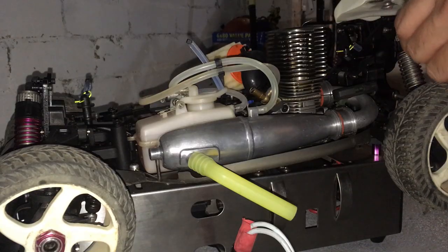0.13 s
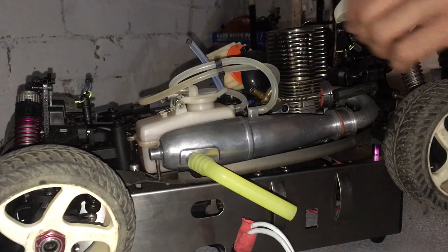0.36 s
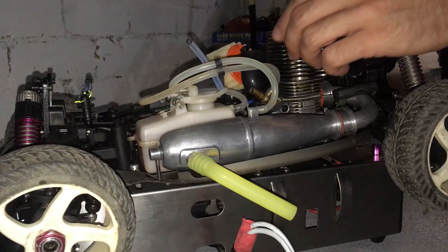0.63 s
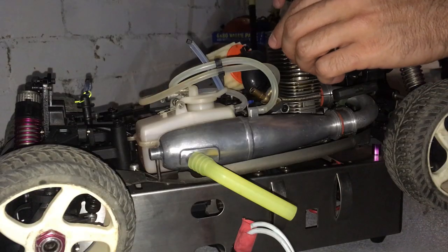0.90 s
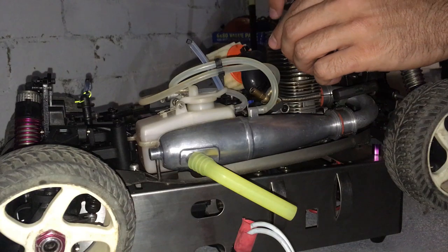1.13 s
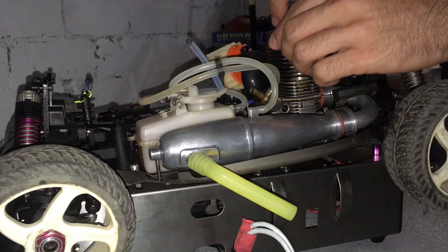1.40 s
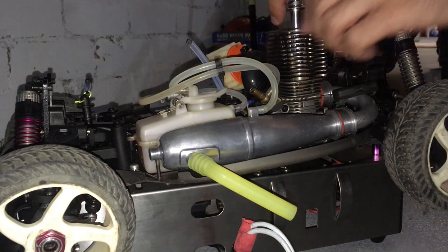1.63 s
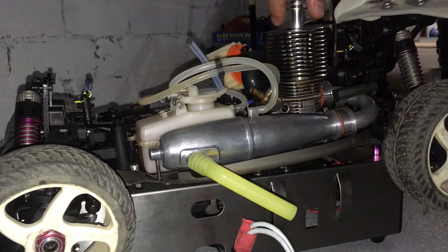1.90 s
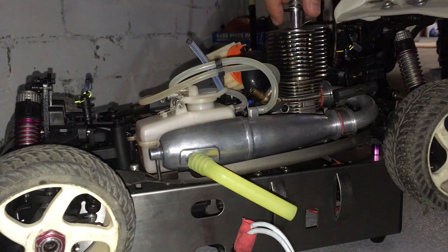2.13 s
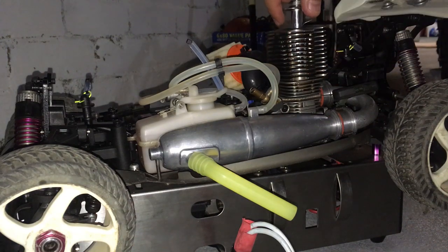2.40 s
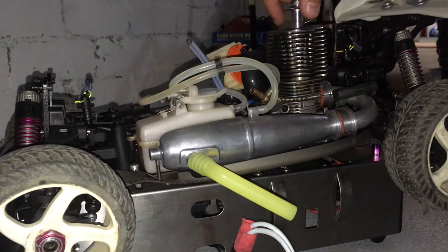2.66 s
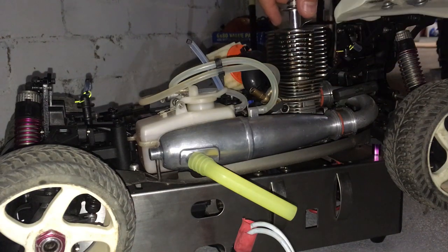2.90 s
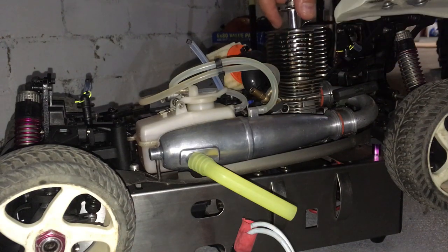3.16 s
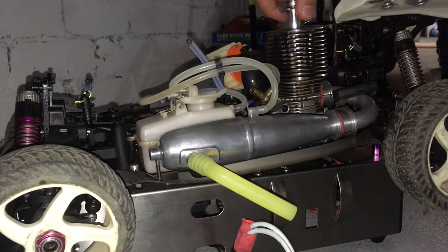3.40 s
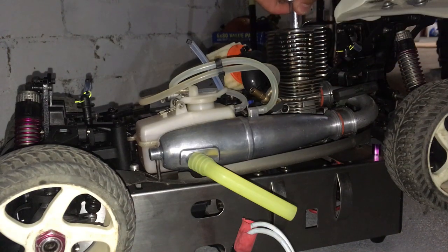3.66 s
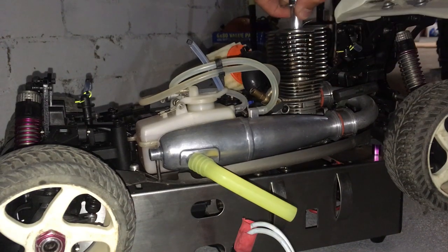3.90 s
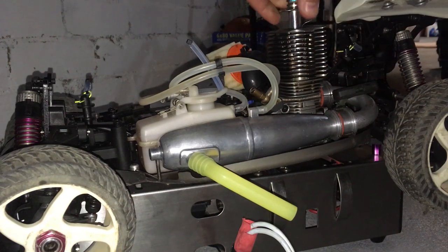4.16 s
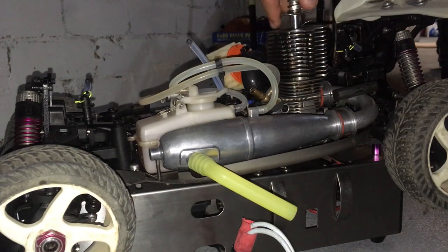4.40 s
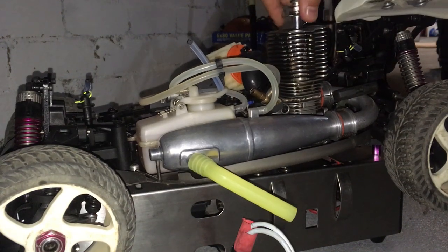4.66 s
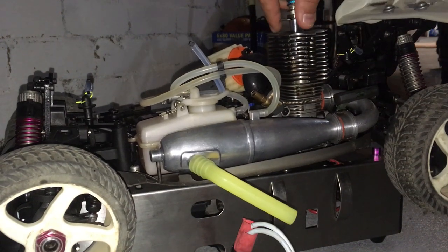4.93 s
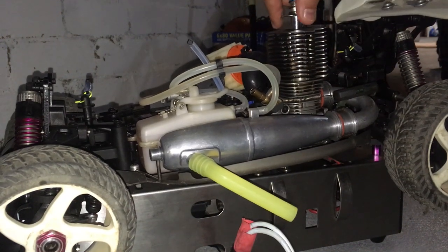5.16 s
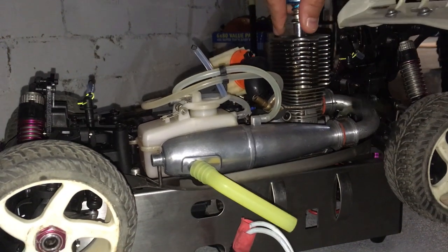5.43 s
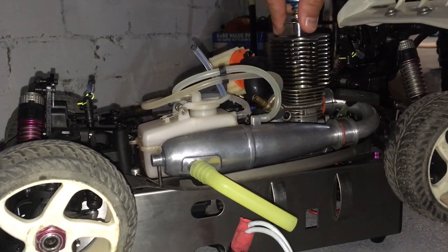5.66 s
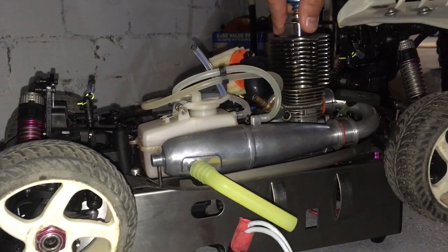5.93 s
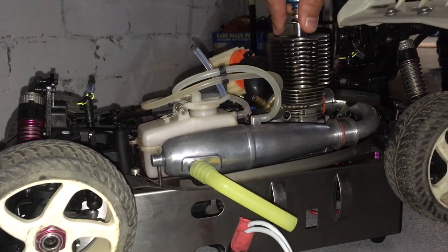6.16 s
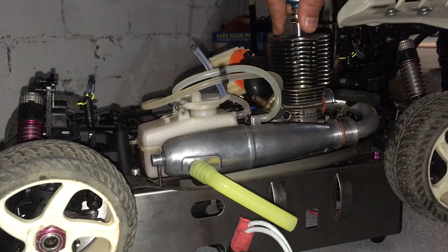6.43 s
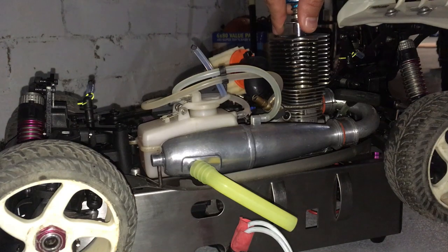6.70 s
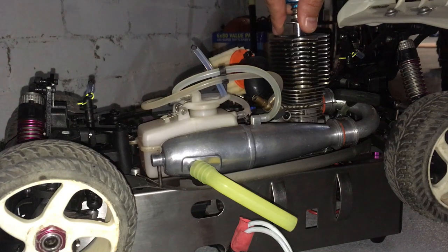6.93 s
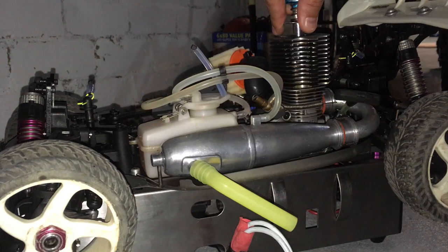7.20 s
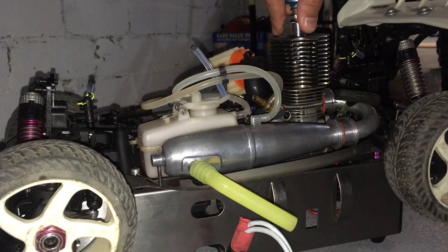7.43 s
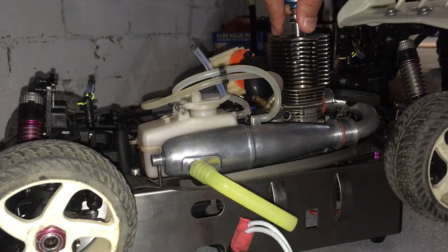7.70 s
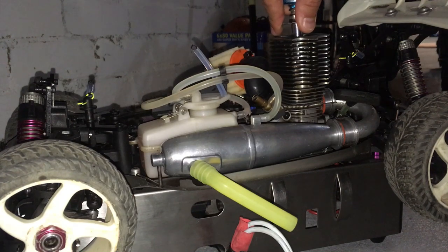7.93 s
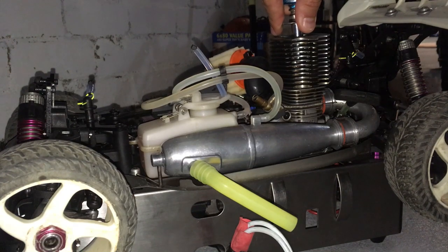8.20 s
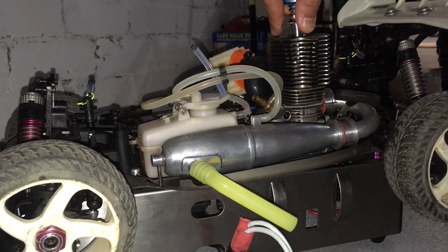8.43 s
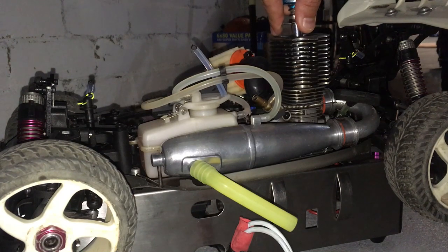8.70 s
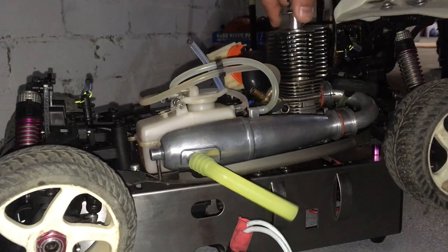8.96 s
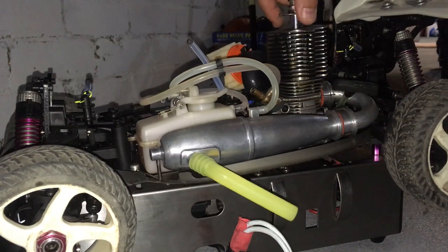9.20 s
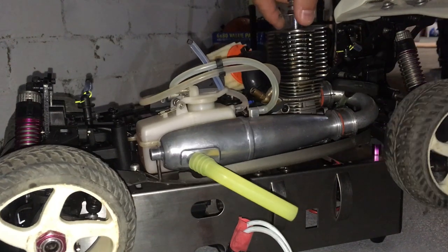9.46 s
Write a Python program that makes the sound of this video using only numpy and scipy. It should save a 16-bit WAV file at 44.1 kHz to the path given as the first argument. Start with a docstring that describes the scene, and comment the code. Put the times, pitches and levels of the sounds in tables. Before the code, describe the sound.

Close to a model car in a quiet garage with a low hum. Small taps and finger rubs come first, with one firmer knock, then a bright ringing metal snap. An electric starter whirs up over a boxy rumble, sags, and the small two-stroke catches abruptly, far louder. It sputters in fast irregular clatters with metallic hiss and a thin whistle, turning more jingly at the end.

```python
"""A small two-stroke engine of a model car turns at idle, clattering hard every few turns: shaft orders, plus
noise pulsed by the crank and filtered by body and metal modes. Thin whistles ride on it. Before that an
electric starter box spins up (gear mesh whine over a rumble) and the car is pressed onto its wheel. First of
all, hands fumble with the glow igniter (decaying noise bursts), which snaps on (a crack and ringing modes).
The quiet garage adds a diffuse tail, filtered noise and two hums."""
import sys
import numpy as np
from scipy import signal
from scipy.io import wavfile
from scipy.ndimage import uniform_filter1d

SR = 44100
rng = np.random.default_rng(int(sys.argv[2]) if len(sys.argv) > 2 else 0)


def wav_out(sig):
    """Save sig, one row per channel (or a flat mono array), as 16-bit PCM at SR to the path in sys.argv[1]."""
    wavfile.write(sys.argv[1], SR, np.round(np.clip(np.atleast_2d(sig).T, -1, 1) * 32767).astype(np.int16))


def boost_factor(decibels):
    """Convert a level in decibels to a linear amplitude factor."""
    exponent = np.asarray(decibels, float) / 20
    return 10 ** exponent


N = 422478  # length [samples]


def evened(x):
    """Normalization: scales a signal to rms 1."""
    return x / np.sqrt(np.mean(x ** 2) + 1e-20)


def curves(rows):
    """Linear interpolation of each column over time, and a soft-edged mask for the span of the rows."""
    s, *columns = np.transpose(rows)
    t = np.arange(N) / SR
    inside = 1. * ((t > s[0]) & (t < s[-1]))
    return [np.interp(t, s, c) for c in columns] + [uniform_filter1d(inside, size=200)]


def colour(x, points, modes=(), size=8192):
    """Minimum-phase filtering: a smooth spectrum plus resonant peaks, impulse response of energy 1."""
    hz = abs(np.fft.fftfreq(size, 1 / SR))
    points_hz, points_db = np.array(points).T
    power = boost_factor(np.interp(np.log(hz + 1), np.log(points_hz + 1), points_db)) ** 2
    for f, width, db in modes:
        power = power + boost_factor(db) ** 2 / (1 + (2 * (hz - f) / max(width, 4)) ** 2) ** 2
    log_gain = .5 * np.log(power + 1e-10)
    # the Hilbert transform of the log gain supplies the minimum phase
    taps = np.fft.ifft(np.exp(signal.hilbert(log_gain).conj())).real[:size // 2]
    return signal.oaconvolve(x, taps / np.linalg.norm(taps))[:len(x)]


def wander(hz):
    """Low-pass random process: slow chance of rms 1, up to about the given frequency."""
    return evened(signal.sosfilt(signal.butter(2, hz, fs=SR, output="sos"), rng.standard_normal(N)))


def bursts(s, db, t60, rise_s, size=SR // 4):
    """Impulsive excitation: at each time a quick rise and an exponential fall of 60 dB in t60 [s]."""
    t, out = np.arange(size) / SR, np.zeros(N + size)
    shape = (1 - np.exp(-t / rise_s)) * boost_factor(-60 * t / t60)
    gains = boost_factor(db) * np.ones(len(s)) / shape.max()
    for at, gain in zip((np.asarray(s) * SR).astype(int), gains):
        out[at:at + size] += gain * shape
    return out[:N]


# engine noise: (time [s], relative body noise level [dB], relative metal hiss level [dB])
ENGINE = [(5.432, -12, -21), (5.945, -12.5, -20.5), (5.975, -25, -28), (6.5, -22.5, -25),
          (8.88, -21.5, -24.5), (8.96, -23, -24), (9.58, -21.5, -25.5)]
# shaft speed: (time [s], rate [turns/s])
SPEED = [(5.41, 112.0), (5.5, 121.0), (5.57, 126.0), (5.72, 138.9), (5.96, 140.1), (6.08, 141.6),
         (7.32, 141.25), (7.55, 142.2), (8.0, 142.3), (8.22, 143.6), (8.9, 144.2), (9.0, 147.0),
         (9.12, 155.0), (9.58, 155.0)]
START_TURN = .22  # crank position at time zero [turns]
# course of the run, 0 catching, 1 pressed, 2 settled, 3 faster, 4 rattling: (time [s], stage [-])
STAGE = [(5.41, 0), (5.66, 0), (5.72, 1), (5.95, 1), (5.98, 2), (8.08, 2), (8.2, 3), (8.91, 3), (8.95, 4),
         (9.6, 4)]
# shaft orders, the quarter ones strongest when rattling:
# (multiple of shaft rate [-], then nominal rms level [dB] catching, pressed, settled, faster, rattling)
ORDERS = [(1, -34, -31, -37.5, -36, -43), (1.25, -60, -60, -60, -60, -46), (1.5, -60, -60, -60, -60, -48),
          (2, -39, -50, -60, -56, -55), (2.25, -60, -60, -60, -60, -40), (2.5, -60, -60, -60, -60, -46),
          (2.75, -60, -60, -60, -60, -47), (3, -33, -39, -53, -55, -55), (3.5, -60, -60, -60, -60, -40),
          (3.75, -60, -60, -60, -60, -41), (4, -44, -30, -44, -41, -51), (4.75, -60, -60, -60, -60, -42),
          (5, -34, -33, -30.5, -42, -55), (8, -46, -35, -33, -34, -45), (9, -42, -45, -55, -54, -42),
          (10, -38, -40, -34, -37, -44), (11, -50, -38, -39, -40, -46), (12, -45, -43, -52, -58, -43)]
# hand pushing the car down: (time [s], share [0-1])
PRESSED = [(5.41, 1), (5.95, 0.44), (5.975, 0.33), (9.6, 0)]
# loose igniter ringing on the plug: (time [s], share [0-1])
RINGING = [(5.41, 0.2), (8.9, 0), (8.98, 0.82), (9.6, 1)]
# smooth body spectrum: (frequency [Hz], relative level [dB])
BODY = [(18, -71), (30, -35), (135, 0.5), (218, -14.5), (618, -7.5), (707, 4.5), (809, -5.5), (1120, 2),
        (1290, -4.5), (1420, -6), (3000, -12.5), (3900, -55), (6600, -120)]
# chassis and pipe: (frequency [Hz], width [Hz], relative level [dB] free, pressed, rattling)
BODY_MODES = [(89.7, 18, -47, -2.5, -32), (265.6, 20.5, -15.5, -5, -20), (368, 145, -15.5, -8, -13.5),
              (547.2, 29.5, -4.5, 1, 0), (720, 36, -7, 0, -11), (960, 140, -16, -14, -7),
              (1139, 115, -1.5, -1.5, -1), (1415, 84, 2, -9, 3.5), (1466, 59, -28, 4, -2.5),
              (1594, 133, -1.5, -9, -0.5), (1797, 140, -7, -14, -8.5), (2168, 97, -7, -38, -6.5)]
# smooth metal spectrum: (frequency [Hz], relative level [dB])
METAL = [(1200, -40.5), (1800, -7), (2500, -3.5), (4200, -1.5), (5200, -5), (5500, -7), (7200, -5.5),
         (9000, -7), (9600, -8.5), (11000, -7), (12800, -8.5), (15500, -3)]
# head fins, clutch and igniter: (frequency [Hz], nominal width [Hz], relative level [dB] plain, ringing)
METAL_MODES = [(3340, 360, 0, 0), (4660, 140, 6, 0), (4860, 100, 4, -3), (5910, 110, 2, 8),
               (6120, 60, -3, 9), (6300, 120, 3, 2), (6480, 180, 3, 8), (6680, 60, 1, 0),
               (8440, 400, -1, -3), (9320, 90, 0, -3), (10100, 220, -2, 5), (11200, 220, 4, 1),
               (11800, 200, 0, -1), (13900, 300, 1, 3), (14230, 220, -4, 7), (15600, 300, 3, -1)]


def engine():
    """Source-filter principle: crank-timed pulses of noise excite body and metal modes, over shaft harmonics."""
    body_db, metal_db, on = curves(ENGINE)
    (pressed, _), (ringing, _), (stage, _) = curves(PRESSED), curves(RINGING), curves(STAGE)
    turns = START_TURN + np.cumsum(curves(SPEED)[0]) / SR

    # one tick each turn, of random strength
    tick_s = np.flatnonzero(np.diff(np.floor(turns))) / SR
    tick_db = 3.1 * rng.standard_normal(len(tick_s))
    ticks = bursts(tick_s, tick_db, 0.027, rise_s=0.000074, size=2000)

    s, db = firings(turns)
    swollen_ticks = bursts(s, db, 0.049, rise_s=0.011, size=8000) * (0.21 + ticks)
    hard = bursts(s, db, 0.035, rise_s=0.000087, size=4000) + 0.24 * swollen_ticks
    blow = bursts(s, db, 0.00088, rise_s=.0001, size=200)  # one push into the body at each clatter
    # the loose igniter jingles through each clatter
    shake = bursts(s - .004, db, 0.04, rise_s=0.0036, size=4000)

    orders = np.zeros(N)
    for multiple, *stage_db in ORDERS:
        order_db = np.interp(stage, range(5), stage_db) + 0.4 * wander(9.7)
        orders += np.sqrt(2) * boost_factor(order_db) * np.sin(2 * np.pi * (multiple * turns + rng.random()))

    thud_noise, hiss_noise, crash_noise = rng.standard_normal((3, N))
    thud_level = boost_factor(body_db - 8.5) * (0.62 + 1.29 * ticks) + boost_factor(-27.0 + 15.2 * pressed) * hard
    thud = thud_noise * thud_level + boost_factor(-13.5) * blow
    hiss = hiss_noise * boost_factor(metal_db) * (0.86 + 0.47 * ticks)
    crash = crash_noise * (boost_factor(-8) * hard + ringing * boost_factor(-17.5) * shake)
    crash += boost_factor(-6.5) * np.diff(blow, prepend=0) * 4

    under = [(f, db - 9.5) for f, db in BODY]
    free_body, pressed_body, rattling_body = [
        colour(thud, under, [(f, w, levels[k]) for f, w, *levels in BODY_MODES]) for k in range(3)]
    # the steady hiss is fairly flat; the clatters ring the metal modes much harder
    plain_metal, ringing_metal = [
        colour(hiss, METAL, [(f, w, levels[k] - 4) for f, w, *levels in METAL_MODES])
        + colour(crash, METAL, [(f, 1.4 * w, levels[k] + 3.5) for f, w, *levels in METAL_MODES])
        for k in range(2)]
    body = (1 - pressed - ringing) * free_body + pressed * pressed_body + ringing * rattling_body
    metal = (1 - ringing) * plain_metal + ringing * ringing_metal
    return on * (orders + body + metal)


# the loudest firings: (time [s], relative peak level [dB])
CLATTERS = [(5.4338, -5), (5.4555, -2.5), (5.4893, -4.5), (5.5854, -9.5), (5.6077, -6), (5.7121, -4),
            (5.7697, -4), (5.8396, -7), (5.899, -5), (5.9298, -6.5), (6.0125, -8.5), (6.041, -9),
            (6.097, -7), (6.1543, -5), (6.1829, -4.5), (6.2592, -6), (6.31, -6), (6.3727, -5), (6.408, -10),
            (6.5209, -5), (6.5983, -7.5), (6.697, -6), (6.849, -13), (6.9102, -10), (6.9593, -12),
            (6.9877, -6), (7.0719, -9), (7.1438, -7.5), (7.228, -7), (7.419, -5.5), (7.5178, -8),
            (7.6103, -6.5), (7.7636, -9), (7.9046, -9.5), (7.9468, -7), (8.101, -7.5), (8.1569, -9),
            (8.3512, -8), (8.4498, -7), (8.5677, -12), (8.6782, -8.5), (8.8175, -6), (8.8657, -8),
            (8.9311, -7), (8.994, 0), (9.0222, -8.5), (9.1381, -7), (9.2214, -6.5), (9.3055, -4.5),
            (9.3358, -4.5), (9.3658, -8.5), (9.3924, -6.5), (9.4446, -7.5), (9.475, -5), (9.5466, -4.5)]
TURNS_PER_FIRING, UNEVEN_TURNS = 4.2, .35  # the rich mixture lights about every fourth turn
# ordinary firings; a longer wait stores more charge
FIRING_DB, DB_PER_TURN_WAITED, FIRING_SPREAD_DB = -10, 1, 1.05


def firings(turns):
    """Irregular combustion: the loudest firings and, between them, ordinary ones whole turns after these."""
    s, db = np.transpose(CLATTERS)
    crank = turns[(s * SR).astype(int)]
    gaps = np.diff(np.append(crank, turns[-1]))
    counts = np.maximum(np.round(gaps / TURNS_PER_FIRING), 1).astype(int)
    steps = np.concatenate([np.arange(1, n) * gap / n for gap, n in zip(gaps, counts)])
    timing_luck, level_luck = rng.standard_normal((2, len(steps)))
    at = np.repeat(crank, counts - 1) + np.round(steps + UNEVEN_TURNS * timing_luck)
    before = np.sort(np.append(crank, at))
    waited = at - before[np.searchsorted(before, at) - 1]
    level_db = FIRING_DB + DB_PER_TURN_WAITED * (waited - TURNS_PER_FIRING) + FIRING_SPREAD_DB * level_luck
    return np.append(s, np.searchsorted(turns, at) / SR), np.append(db, level_db)


# a long thin whistle and a brief one, each: (time [s], nominal frequency [Hz], nominal rms level [dB])
WHISTLE = [
    [(5.98, 3975, -50), (7.6, 3990, -46), (7.8, 4005, -37), (8.92, 4012, -36), (9.0, 3750, -43),
     (9.12, 3100, -46), (9.16, 3000, -55)],
    [(9.25, 1860, -45), (9.3, 1850, -27), (9.36, 1700, -40)],
]


def whistle():
    """Frequency and amplitude modulation: thin sine tones that waver slightly over the running engine."""
    waver = 1 + .0015 * wander(30)
    flutter_db = 2.5 * wander(25)
    out = np.zeros(N)
    for hz, db, on in map(curves, WHISTLE):
        phase = 2 * np.pi * np.cumsum(hz * waver) / SR
        out += on * np.sqrt(2) * boost_factor(db + flutter_db) * np.sin(phase)
    return out


# starter motor: (time [s], gear mesh frequency [Hz], relative mesh level [dB], relative box rumble level [dB])
STARTER = [(4.94, 1387, -32, -37.5), (5.03, 2880, -23, -28.5), (5.09, 3420, -27.5, -28.5),
           (5.14, 3337, -25.5, -26.5), (5.33, 2228, -29.5, -30), (5.36, 2900, -22, -30.5),
           (5.412, 3260, -23, -26), (5.51, 3515, -31, -29), (5.7, 3530, -41, -32)]
TEETH = 13  # gear mesh cycles in each shaft turn
# harmonics of the gear mesh: (multiple [-], relative level [dB])
MESH_ORDERS = [(1, 0), (2, -19), (3, -21)]
# smooth box spectrum: (frequency [Hz], relative level [dB])
BOX = [(35, -59), (60, -30), (227, -4), (480, -18), (682, 9), (842, 0.5), (2580, -1.5), (2900, 3.5),
       (4030, -15.5), (16000, -17)]
# box resonances: (frequency [Hz], width [Hz], relative level [dB])
BOX_MODES = [(645, 214, -5.5), (1158, 120, -0.5), (1430, 50, -11), (1620, 22, -11), (1840, 72, -3)]
# the motor kicks the box: (time [s], relative peak level [dB])
CLUNKS = [(4.947, -10), (4.968, -22.5), (5.038, -28), (5.342, -15.5), (5.419, -16)]
# what a clunk rings: (frequency [Hz], width [Hz], relative level [dB])
KICKED = [(316, 190, -12.5), (688, 88, 10), (1130, 370, -4.5), (1800, 190, -6)]


def starter():
    """Gear mesh principle: tooth rate is shaft rate times teeth; a fuzzy whine, a shaft tone and a rumbling box."""
    mesh_hz, mesh_db, box_db, on = curves(STARTER)
    mesh_turns = np.cumsum(mesh_hz * (1 + .03 * wander(120))) / SR  # uneven teeth smear the whine
    mesh = sum(boost_factor(db) * (1.04 + 0.55 * wander(320)) * np.sin(2 * np.pi * k * mesh_turns)
               for k, db in MESH_ORDERS)
    shaft_turns = np.cumsum(mesh_hz / TEETH) / SR
    # the load stills the box once the car is pressed on
    free = np.interp(np.arange(N) / SR, [5.40, 5.43], [1, 0])
    shaft_level = free * boost_factor(-38.0) * np.clip(mesh_hz / 2200, 0, 1) ** 4
    shaft_tone = shaft_level * np.sin(2 * np.pi * shaft_turns)

    shaking = free * on * boost_factor(box_db + 2.0) * (1 + 0.1 * np.cos(2 * np.pi * shaft_turns))
    box_modes = [(f, w, db + 12.5) for f, w, db in BOX_MODES]
    rumble = colour(rng.standard_normal(N) * shaking, BOX, box_modes)

    s, db = np.transpose(CLUNKS)
    kick_noise = rng.standard_normal(N) * bursts(s, db - 1, 0.12, rise_s=0.00048)
    kicks = colour(kick_noise, [(100, -27), (3000, -24.5), (16000, -57)], KICKED)
    return on * (boost_factor(mesh_db) * mesh + shaft_tone) + rumble + kicks


# the igniter clamp shuts and bounces: (time [s], relative peak level [dB])
SNAPS = [(4.2955, -4), (4.302, -9)]
# spectrum of the crack: (frequency [Hz], relative level [dB])
SNAP_CRACK = [(80, -27), (300, -17), (750, -9), (1600, -8.5), (3500, -7), (5000, -8), (8000, -2),
              (11000, -8.5), (16000, -9.5)]
# ringing clamp: (frequency [Hz], relative level [dB], decay time t60 [s])
CLAMP = [(4231, 0, .45), (4275, -3, .38), (5911, -5, .25), (6471, -3, .22), (7950, 0, .22), (8473, -6, .3),
         (9383, -2, .28)]


def snap():
    """Modal impact: a shutting steel clamp gives a crack of noise and exponentially decaying modes."""
    s, db = np.transpose(SNAPS)
    crack = colour(rng.standard_normal(N) * bursts(s, db - 8.5, 0.041, rise_s=0.00023), SNAP_CRACK)
    t = np.arange(SR) / SR
    ring = sum(boost_factor(d - 60 * t / t60) * np.sin(2 * np.pi * f * t) for f, d, t60 in CLAMP)
    strikes = bursts(s, db - 36, .0004, rise_s=.00002)
    return crack + signal.oaconvolve(strikes, ring)[:N]


# small knocks of the hands and igniter: (time [s], relative peak level [dB], clack above that [dB],
# treble above that [dB], decay time t60 of the dull part [s])
TAPS = [(0.813, -43.5, 2.5, 1, 0.098), (0.985, -62, -11, 4, 0.091), (1.238, -45.5, -8, -11, 0.093),
        (1.262, -46, -16, -2, 0.038), (1.709, -64, 1, -2.5, 0.086), (1.969, -64, -9, -26, 0.085),
        (2.169, -59, -6, -18, 0.091), (2.238, -55.5, -6, -11, 0.25), (2.379, -48, -30, -29, 0.046),
        (2.445, -49, -26, -25.5, 0.1), (2.545, -53, 1, -17, 0.068), (2.643, -43.5, -10, -6, 0.38),
        (2.674, -20.5, -12, -34, 0.057), (2.971, -51, -23, -24, 0.06), (3.019, -53.5, -15, -23, 0.046),
        (3.481, -57, -13, -3, 0.12), (3.8, -59, -29, -25, 0.1), (3.994, -58, -14, -3, 0.11),
        (4.218, -44, -6, -13, 0.11), (4.712, -33, -39, -38.5, 0.044)]
# strokes of fingers on metal and plastic:
# (start [s], length [s], relative dull level [dB], relative bright level [dB])
RUBS = [(1.913, 0.19, -64, -70), (2.038, 0.12, -53.5, -50.5), (2.234, 0.13, -60.5, -67),
        (2.34, 0.066, -57, -80), (2.415, .1, -46.5, -60), (2.476, 0.11, -51.5, -49.5),
        (2.68, 0.14, -43, -63), (2.803, 0.17, -53, -52.5), (4.256, 0.078, -57, -61),
        (4.732, 0.26, -63, -77)]
RUB_PEAK, RUB_EDGE_DB = 0.25, -20.5  # share of the stroke at which it is loudest; level at its ends
# what the taps and rubs ring: (frequency [Hz], width [Hz], relative level [dB])
CHASSIS = [(823, 37, 1.5), (970, 160, -1.5), (1250, 120, -7), (1420, 120, -7), (1620, 16, -12),
           (1870, 35, -5.5), (2660, 34, -17)]
# metal part of a tap: (frequency [Hz], relative level [dB])
CLACK = [(900, -36), (2000, 6), (2500, 3), (3300, -6.5), (6000, -36)]


def hands():
    """Impact and friction: noise bursts and grainy strokes split into chassis ring, metal clack and dry hiss."""
    dull, clack, bright = np.zeros((3, N))
    grain = boost_factor(5.9 * wander(70) - 5.5)
    for s, db, clack_db, treble_db, t60 in TAPS:
        dull += bursts([s], db - 7.5, t60, rise_s=0.00031, size=8000)
        clack += bursts([s], db + clack_db - 1, 0.3 * t60, rise_s=.0003, size=8000)
        bright += bursts([s], db + treble_db + 0.5, .5 * t60, rise_s=.0003, size=8000)
    for s, length, dull_db, bright_db in RUBS:
        stroke_db, on = curves([(s, RUB_EDGE_DB), (s + RUB_PEAK * length, 0), (s + length, RUB_EDGE_DB)])
        dull += boost_factor(dull_db + stroke_db) * on * grain
        bright += boost_factor(bright_db + stroke_db) * on * grain
    dull_noise, bright_noise, clack_noise = rng.standard_normal((3, N))
    chassis = colour(dull_noise * dull, [(100, -4.5), (450, -6.0), (1500, -3), (2500, -19), (7000, -52)],
                     CHASSIS)
    metal = colour(clack_noise * clack, CLACK)
    hiss = colour(bright_noise * bright, [(1200, -18.5), (3500, 0), (9000, -2.5), (15000, -1), (17000, 3.5)],
                  [(14900, 150, 5)])
    return chassis + metal + hiss


# decay of the room: (frequency [Hz], decay time t60 [s])
GARAGE = [(250, 0.07), (660, 0.42), (1740, 0.32), (4590, 0.4), (12100, 0.27)]


def garage(x):
    """Diffuse reverberation: sparse taps of random sign, each band decaying at its own rate."""
    taps = np.zeros(SR)
    at = np.arange(200, SR - 20, 20)
    taps[at + rng.integers(0, 20, len(at))] = rng.choice([-1., 1.], len(at))
    hz, t, z = signal.stft(taps, SR, nperseg=256)
    t60 = np.clip(np.interp(hz, *np.transpose(GARAGE)), .1, 2)
    tail = signal.istft(z * boost_factor(-60 * t / t60[:, None]), SR, nperseg=256)[1]
    return signal.oaconvolve(x, tail / np.linalg.norm(tail))[:N]


# spectrum of the air noise: (frequency [Hz], relative level [dB])
ROOM_AIR = [(15, -59), (25, -18), (39, -13), (102, -6), (127, -9.5), (293, -14), (335, -13.5), (545, -28),
            (641, -21.5), (1100, -28), (8140, -39.5), (9070, -33.5), (16000, -40.5)]
# far machinery: (frequency [Hz], bandwidth of the wavering [Hz], peak level of the steady part [dB])
HUM = [(59, 8, -71.5), (96, 8, -66.5)]
# a low rumble before the start: (time [s], rms level [dB])
SWELL = [(4.25, -69), (4.3, -49.5), (4.36, -54.5), (4.92, -54.5), (4.95, -43)]


def room_air():
    """Stationary background: filtered noise and two narrow-band hums in quadrature, plus one rumble swell."""
    t = np.arange(N) / SR
    hums = np.zeros(N)
    for f, width, db in HUM:
        in_phase = (1 + .6 * wander(width)) * np.sin(2 * np.pi * f * t)
        quadrature = 0.69 * wander(width) * np.cos(2 * np.pi * f * t)
        hums += boost_factor(db) * (in_phase + quadrature)
    swell_db, on = curves(SWELL)
    rumble = colour(rng.standard_normal(N), [(25, -10), (95, 9.0), (200, -10.0), (380, -7), (550, -37)])
    drift_db = wander(2.5)
    air = boost_factor(-68.5 + drift_db) * colour(rng.standard_normal(N), ROOM_AIR)
    return air + hums + on * boost_factor(swell_db) * rumble


def scene():
    """Superposition: direct sound of all sources, their reverberation in the garage, and its air."""
    near = hands() + snap()
    machine = engine() + whistle() + starter()
    reverberation = garage(boost_factor(-5.5) * near + boost_factor(-11.0) * machine)
    return (near + machine + reverberation + room_air())[None]


def roll_off(x):
    """The treble ends steeply here."""
    return signal.sosfilt(signal.butter(12, 16650, fs=SR, output="sos"), x)


def record(dry):
    """Saturation and band limiting: a soft tanh overload, then a linear-phase low-pass at 15780 Hz."""
    overloaded = 1.1 * np.tanh(dry / 1.1)
    low_pass = signal.firwin(511, 15780, window=("kaiser", 9), fs=SR)
    limited = signal.oaconvolve(overloaded, low_pass[None], "same")
    return roll_off(limited)


dry = scene()
out = record(dry)
wav_out(out)
```